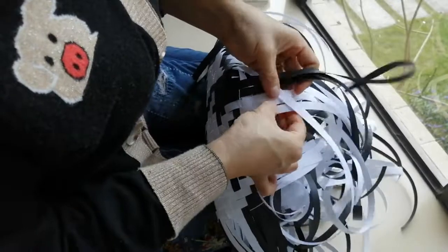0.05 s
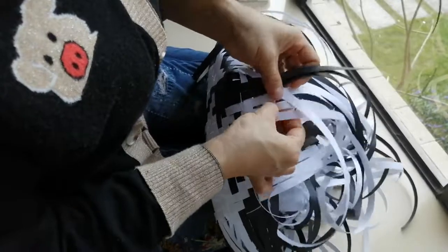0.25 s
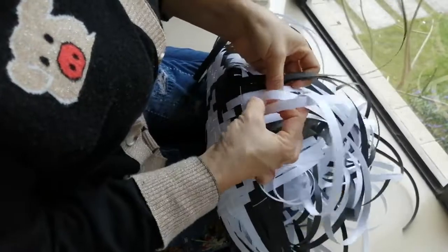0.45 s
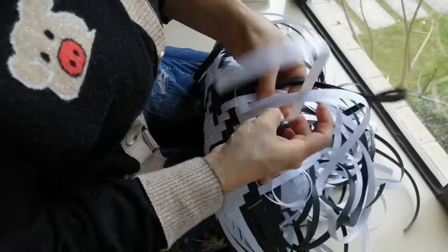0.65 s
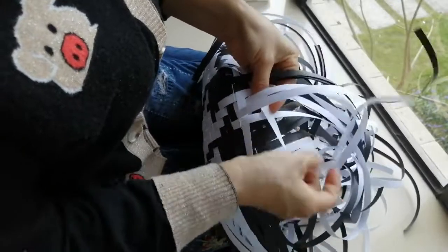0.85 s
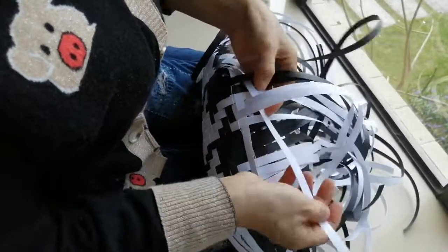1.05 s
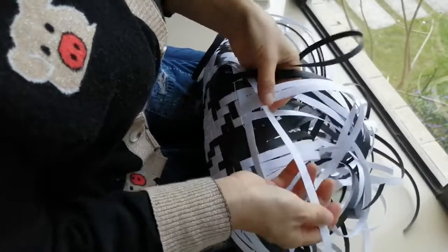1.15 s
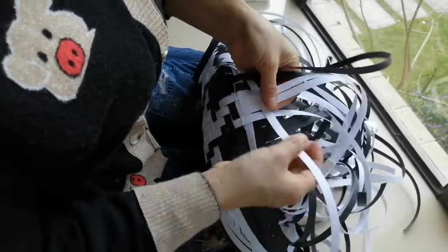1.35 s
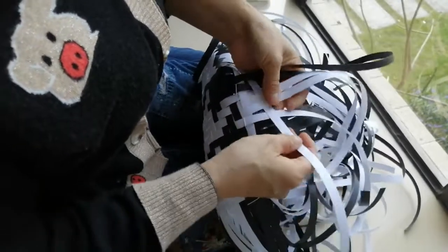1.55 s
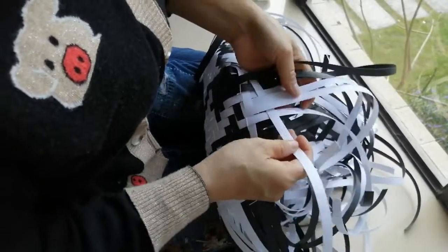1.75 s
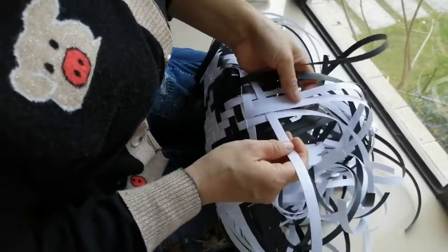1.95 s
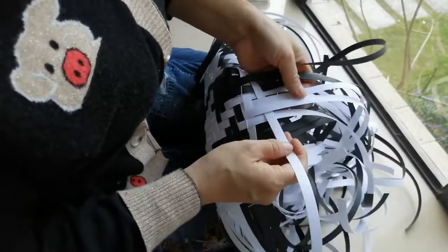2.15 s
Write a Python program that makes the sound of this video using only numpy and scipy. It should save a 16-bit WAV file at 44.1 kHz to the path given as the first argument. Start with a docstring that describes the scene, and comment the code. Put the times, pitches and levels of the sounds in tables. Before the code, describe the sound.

In a quiet room, plastic strips are woven by hand near the microphone. One slides through in uneven, clicking surges, zings and pulls tight with a sharp snap, followed by a faint whine and light rustling.

```python
"""A quiet room where stiff plastic strips are woven by hand. One strip hisses through the weave,
ticking on its neighbours and knocking the basket, zings as it speeds up, then snaps tight.
A thin, high, metallic ring sounds with the snap and fades; a brief whine follows.
The loose ends settle and are fingered into place. Two small microphone ports, each with its own
resonances, hear this over a low room rumble and the soft rub of hands."""
import sys
import numpy as np
from scipy import signal
from scipy.fft import rfft, irfft
from scipy.io import wavfile
from scipy.ndimage import map_coordinates

SR = 44100
rng = np.random.default_rng(int(sys.argv[2]) if len(sys.argv) > 2 else 0)


def digitize_waveform(pressure):
    """Quantize a signal to 16-bit integers and store it at the path in sys.argv[1].

    Rows of a 2-D input are taken as channels; values are limited to [-1, 1].
    """
    field = np.atleast_2d(pressure).T
    bounded = np.clip(field, -1, 1)
    quanta = np.round(bounded * 32767).astype(np.int16)
    wavfile.write(sys.argv[1], SR, quanta)


N = 97020
TIME = np.arange(N) / SR
FREQS = np.fft.rfftfreq(2 * N, 1 / SR)


def amp(db):
    """Decibels to gain."""
    return 10 ** (np.asarray(db) / 20)


def unit(x):
    """Scale to rms 1."""
    return x / np.sqrt(np.mean(x ** 2) + 1e-20)


def along(points, hz=FREQS):
    """Read a curve on a log frequency axis."""
    f, values = np.transpose(points)
    return np.interp(np.log(hz + 1), np.log(f + 1), values)


def eq(points, tilt_db=0):
    """EQ curve with unit power, tilted by tilt_db per octave."""
    return unit(amp(along(points) + tilt_db * np.log2(np.maximum(FREQS, points[0][0]))))


def colour(x, gain):
    """Minimum-phase filter: nothing rings ahead of an attack."""
    cepstrum = irfft(np.log(np.maximum(gain, 1e-6)))
    cepstrum[1:N] *= 2
    cepstrum[N + 1:] = 0
    return irfft(rfft(x, 2 * N) * np.exp(rfft(cepstrum)))[..., :N]


def wobble(rate):
    """Smooth random modulator, rate knots a second."""
    return map_coordinates(rng.standard_normal(int(N * rate / SR) + 4), [TIME * rate])


def burst(start, db, t60, rise_s):
    """A contact: a short dying crackle that reaches each port differently."""
    age = np.maximum(TIME - start, 0)
    envelope = (1 - np.exp(-age / rise_s)) * amp(-60 * age / t60)
    return amp(db) * unit(rng.standard_normal((2, N)) * envelope) * np.sqrt(np.mean(envelope ** 2))


# EQ of the room's rumble and air (f/Hz, level/dB)
ROOM_TONE_EQ = [(20, -13.5), (35, 0), (50, 4), (70, -2.5), (100, -6.5), (138, -6.5), (172, -21.5),
                (230, -14.5), (320, -13.5), (550, -17), (1000, -16), (1600, -27), (3000, -33), (7000, -40),
                (15000, -45.5)]
# how alike the two ports hear it (f/Hz, correlation)
CORRELATION = [(30, 0.98), (120, 0.8), (350, 0.97), (700, 0.29), (1500, 0), (8000, 0)]
# fader ride on the deepest rumble (t/s, level/dB)
RUMBLE_RIDE = [(0, 0), (.2, 3.5), (.5, 0), (.72, 0), (.85, -0.5), (1.1, -8.5), (1.3, 2), (1.5, -1.5),
               (1.7, 4), (2.2, 3.5)]

def room_tone(level_db=-51.5, pan_db=-0.37, crossover_hz=84):
    """A near-centred rumble whose low end swells and sinks, under faint wide air."""
    width = np.arccos(np.clip(along(CORRELATION), -.99, .99)) / 2
    mid = colour(rng.standard_normal(N), eq(ROOM_TONE_EQ) * np.cos(width))
    side = colour(rng.standard_normal(N), eq(ROOM_TONE_EQ) * np.sin(width))
    bed = np.array([mid + side, mid - side]) * amp([[level_db + pan_db], [level_db - pan_db]])
    lows = irfft(rfft(bed, 2 * N) / (1 + (FREQS / crossover_hz) ** 6))[:, :N]
    return bed - lows + lows * amp(np.interp(TIME, *np.transpose(RUMBLE_RIDE)))


# fader ride on the hands' rub (t/s, level/dB)
HANDLING_RIDE = [(0, -63.5), (1.15, -76), (1.3, -63), (1.48, -57), (1.75, -61.5), (1.9, -65), (2.2, -61)]
# its dull EQ (f/Hz, level/dB)
HANDLING_EQ = [(40, -29), (75, 4.5), (140, 3.5), (175, -7.5), (230, -1), (320, -4), (500, -13.5),
               (1000, -37), (4000, -37)]

def handling():
    """Hands shifting the basket make a soft low rub."""
    centre, wide = rng.standard_normal(N), 1.17 * rng.standard_normal((2, N))
    return colour(centre + wide, eq(HANDLING_EQ)) * amp(np.interp(TIME, *np.transpose(HANDLING_RIDE)))


def friction(rate, grain_db, spread_db, flutter_db):
    """Tiny slips of random size over a smooth rub, fluttering as the grip changes."""
    slips = (rng.random(N) < rate / SR) * amp(spread_db * np.minimum(rng.exponential(size=N), 2))
    rub = rng.standard_normal((2, N))
    grain = amp(grain_db) * unit(slips * rng.standard_normal((2, N)))
    return unit((rub + grain) * amp(flutter_db * (wobble(60.05) + wobble(220))))


# EQs of a strip's face and of its edges (f/Hz, level/dB)
HISS_EQ = [(400, -9.5), (1500, -17), (3200, -11), (4200, -0.5), (6000, 0.5), (8000, -0.5), (10000, -0.5),
           (12000, -9.5), (15500, -19.5)]
SCRAPE_EQ = [(300, -2), (800, 0.5), (1500, -2), (2400, 1.5), (3200, 5), (4200, -1), (8000, -17),
             (11000, -4), (13000, -5), (15500, -0.5)]

def sliding(stroke, fade_s=0.063, hiss_trim_db=-0.5, scrape_trim_db=1):
    """A strip's face hisses while its ribbed edges scrape."""
    times, hiss_db, scrape_db = np.transpose(stroke)
    gate = np.clip(1 + np.minimum(TIME - times[0], times[-1] - TIME) / fade_s, 0, 1)
    hiss = colour(friction(rate=500, grain_db=-12, spread_db=3.5, flutter_db=1.03), eq(HISS_EQ))
    scrape = colour(friction(rate=430, grain_db=-18.5, spread_db=7.5, flutter_db=2.5), eq(SCRAPE_EQ))
    hiss *= amp(hiss_trim_db + np.interp(TIME, times, hiss_db))
    scrape *= amp(scrape_trim_db + np.interp(TIME, times, scrape_db))
    return gate * (hiss + scrape)


# fader rides for the long pull (t/s, hiss level/dB, scrape level/dB)
PULL_RIDE = [(0, -61.5, -60), (0.08, -68.5, -72), (0.12, -62, -57.5), (0.16, -58, -58), (0.25, -53, -57),
             (0.3, -49, -54), (0.34, -48.5, -54.5), (0.41, -50, -56), (0.47, -43, -50),
             (0.505, -51.5, -53.5), (0.565, -50, -51), (0.6, -45, -52), (0.66, -50.5, -49.5),
             (0.72, -48.5, -49.5), (0.785, -43.5, -52.5), (0.835, -55, -61), (0.885, -48.5, -48.5),
             (0.915, -49, -60.5), (0.94, -56, -59.5), (0.975, -51.5, -53.5), (1.015, -57.5, -60.5)]

def pull():
    """One strip slides through the weave in uneven surges."""
    return sliding(PULL_RIDE)


# tick cues (t/s, level/dB, tilt/dB per octave, t60/s)
TICK_CUES = [(0.103, -51.5, -1, 0.067), (0.132, -38, -6, 0.012), (0.379, -36, -3, 0.0038),
             (0.4228, -44, -4, 0.0046), (0.4408, -40, 4, 0.019), (.519, -38, -6, .007),
             (0.5425, -38, 0.5, 0.023), (0.592, -42, 12, 0.039), (.6265, -31, 4, 0.0049),
             (.7438, -24.5, 1, .005), (0.7516, -37, 5, 0.0054), (.851, -44, 1, 0.0068),
             (0.879, -48, 5, 0.015), (1.11, -40, 0, 0.028), (1.153, -36, -2.5, .008),
             (1.1552, -37.5, -3.5, .012), (1.1993, -37, 5, .02), (1.2095, -43, 5, 0.0087),
             (1.226, -41, 4, .008), (1.2815, -41.5, -2, .02), (1.294, -43, -5, .02), (1.308, -45, 0, .008),
             (1.6393, -46.5, 3, 0.065), (1.6993, -49, 10, 0.013), (1.708, -40, 3, 0.0086),
             (1.755, -55, -4.5, 0.057)]
# their EQ before the tilt (f/Hz, level/dB)
TICK_EQ = [(300, -3), (1000, -2), (3000, 4.5), (6000, 7), (10000, -1.5), (12000, 2), (15500, -44)]

def ticks():
    """Strips flick against each other, each flick with its own brightness."""
    return sum(colour(burst(start, db, t60, rise_s=.0003), eq(TICK_EQ, tilt))
               for start, db, tilt, t60 in TICK_CUES)


# click cues (t/s, level/dB, t60/s)
CLICK_CUES = [(.2099, -28.5, .006), (.2109, -19, .0035), (.2125, -36, .02), (.3138, -31.5, .02)]
# their crisp EQ (f/Hz, level/dB)
CLICK_EQ = [(1000, -18), (2400, -13), (3300, -7), (4500, -11), (6200, -6), (7400, -6.5), (8800, -1),
            (10200, 1.5), (11500, -4.5), (15500, -7.5)]

def clicks():
    """A strip's edge gives sharp little clicks."""
    hits = sum(burst(start, db, t60, rise_s=.0006) for start, db, t60 in CLICK_CUES)
    return colour(hits, eq(CLICK_EQ))


# knock cues (t/s, level/dB)
KNOCK_CUES = [(.744, -39.5), (1.0393, -50)]
# modes of the woven wall (f/Hz, relative level/dB, t60/s)
BASKET_MODES = [(630, -5, .025), (750, -1, .03), (880, -2, .025), (1030, -3, .028), (1180, -3, .025),
                (1590, -9, .02), (1900, -9, .02), (3160, -5, .025)]

def knocks(rise_s=.0004):
    """Each blow on the basket briefly rings its hollow wall."""
    wall = np.zeros(N)
    for start, db in KNOCK_CUES:
        age = np.maximum(TIME - start, 0)
        attack = 1 - np.exp(-age / rise_s)
        for hz, mode_db, t60 in BASKET_MODES:
            phase = 2 * np.pi * hz * age + rng.uniform(0, 2 * np.pi)
            wall += attack * amp(db + mode_db - 60 * age / t60) * np.sin(phase)
    return wall


def glide(path):
    """Phase and gated envelope of a sound with moving pitch."""
    times, hz, db = np.transpose(path)
    phase = 2 * np.pi * np.cumsum(np.interp(TIME, times, hz)) / SR
    return phase, amp(np.interp(TIME, times, db)) * (TIME > times[0]) * (TIME < times[-1])


# sweep into the snap (t/s, f/Hz, level/dB)
ZING_SWEEP = [(0.819, 6340, -55), (.86, 6704, -59), (0.904, 7360, -50), (0.941, 7920, -53.5),
              (0.975, 8220, -45.5), (1.01, 7800, -74)]

def zing(width_hz=3000):
    """The ribbed strip sings a fuzzy band of hiss that climbs as it speeds up."""
    phase, envelope = glide(ZING_SWEEP)
    band = [wobble(width_hz) * np.cos(phase) + wobble(width_hz) * np.sin(phase) for port in range(2)]
    return unit(np.array(band)) * envelope


# slap cues (t/s, level/dB)
SLAP_CUES = [(1.0392, -14), (1.0404, -15.5), (1.0418, -15), (1.0432, -23), (1.0453, -22), (1.0477, -26),
             (1.0658, -29)]
# their bright EQ (f/Hz, level/dB)
SNAP_EQ = [(300, -38), (1200, -24), (1800, -20), (3000, -13), (3900, -5.5), (4600, -0.5), (6000, -5),
           (8000, 0), (10000, 2), (12500, 0.5), (15000, 1.5)]

def snap():
    """The strip jerks tight and slaps over several ribs, each slap echoing in the room."""
    slaps = sum(reverb(burst(start, db, t60=0.0055, rise_s=1 / SR), wet_db=-1) for start, db in SLAP_CUES)
    return colour(slaps, eq(SNAP_EQ))


# ring partials before panning; the two strongest lie close and beat (f/Hz, level/dB, t60/s)
RING_MODES = [(8866, -53, .24), (12272, -36.5, .33), (12368, -32, .32), (14865, -53, .2)]

def ring(attack_s=0.012, pan_db=4.3, lag_cycles=.17, waver_rad=.28):
    """A thin, high, metallic ring sounds with the snap and fades, left of centre."""
    age = np.maximum(TIME - SLAP_CUES[0][0], 0)
    lag = 2 * np.pi * np.array([[0], [lag_cycles]])
    partials = np.zeros((2, N))
    for hz, db, t60 in RING_MODES:
        phase = 2 * np.pi * hz * age - lag + waver_rad * wobble(120)
        partials += amp(db - 60 * age / t60) * np.sin(phase)
    return partials * (1 - np.exp(-age / attack_s)) * amp([[pan_db], [-pan_db]])


# pitch bend hanging on after the snap (t/s, f/Hz, level/dB)
WHINE_BEND = [(1.098, 4340, -66), (1.116, 4360, -53.5), (1.148, 4470, -59), (1.165, 4430, -53.5),
              (1.2, 4405, -56.5), (1.25, 4388, -59.5), (1.275, 4380, -71)]

def whine(roughness=.65, flutter_hz=240):
    """A thin, rough tone rises and sags as the strip slackens."""
    phase, envelope = glide(WHINE_BEND)
    tone = [(1 + roughness * wobble(flutter_hz)) * np.sin(phase + roughness * wobble(flutter_hz))
            for port in range(2)]
    return unit(np.array(tone)) * envelope


# fader rides for the loose ends (t/s, hiss level/dB, scrape level/dB)
SETTLE_RIDE = [(1.21, -55, -57), (1.25, -57.5, -58.5), (1.295, -62.5, -59), (1.36, -58.5, -60),
               (1.41, -59, -61.5), (1.47, -68.5, -65), (1.59, -65, -67.5), (1.65, -58, -57.5),
               (1.705, -55, -61), (1.735, -70, -73), (1.77, -60, -72), (1.87, -68, -71), (1.96, -62.5, -60),
               (2.02, -67, -70), (2.08, -73.5, -75), (2.2, -78, -66.5)]

def settle():
    """Loose ends slide softly as they are fingered into place."""
    return sliding(SETTLE_RIDE)


# the room's decay times (f/Hz, t60/s)
ROOM_DECAY = [(200, 0.088), (2000, 0.96), (6000, 0.24), (10000, 0.35), (15000, 0.23)]

def reverb(x, wet_db, onset_s=0.00067):
    """Add the room's tail; each frequency dies at its own speed."""
    hz, age, spectrum = signal.stft(rng.standard_normal((2, SR // 2)), SR, nperseg=256)
    decay = amp(-60 * age / along(ROOM_DECAY, hz)[:, None])
    tail = signal.istft(spectrum * decay, SR, nperseg=256)[1]
    tail *= 1 - np.exp(-(TIME[:tail.shape[1]] / onset_s) ** 2)
    return x + amp(wet_db) * signal.fftconvolve(x, tail / np.linalg.norm(tail[0]), axes=1)[:, :N]


def scene():
    """Mix the pull, snap and settling over the room's low bed."""
    slides = reverb(pull() + zing() + settle(), wet_db=-11.5)
    contacts = reverb(ticks() + clicks() + knocks(), wet_db=-9)
    return slides + contacts + snap() + ring() + whine() + room_tone() + handling()


# resonances of the two microphone ports (f/Hz, level/dB)
LEFT_EQ = [(1000, -3.5), (3200, -0.5), (4200, -5), (6000, -1), (7600, -0.5), (8400, 4), (9200, 7),
           (10000, 3.5), (11000, -4), (12500, 1), (14000, -2), (15200, -8)]
RIGHT_EQ = [(1000, -1), (3200, 2), (4200, -2.5), (5200, 9), (6200, 11.5), (7000, 8.5), (7800, -1.5),
            (9100, -4.5), (10200, -4), (12500, 0), (14000, 2.5), (15000, 7)]

def record(dry, cutoff_hz=15300):
    """Each port colours its channel, then a steep low-pass cuts the top."""
    ports = np.array([colour(x, amp(along(port))) for x, port in zip(dry, (LEFT_EQ, RIGHT_EQ))])
    return irfft(rfft(ports, 2 * N) / np.sqrt(1 + (FREQS / cutoff_hz) ** 200))[:, :N]


dry = scene()
out = record(dry)
digitize_waveform(out)
```